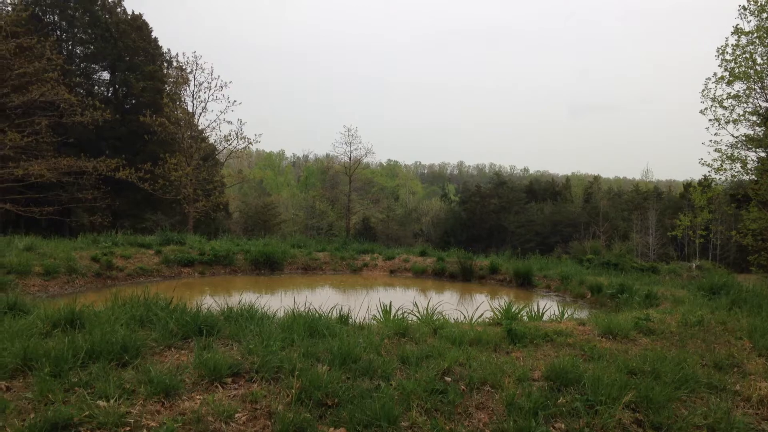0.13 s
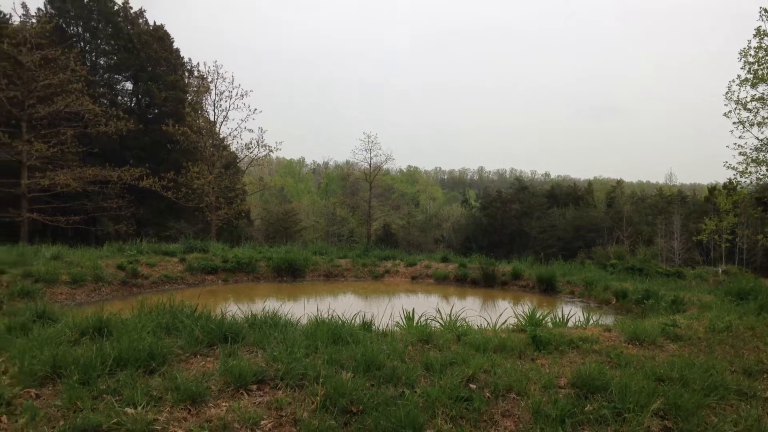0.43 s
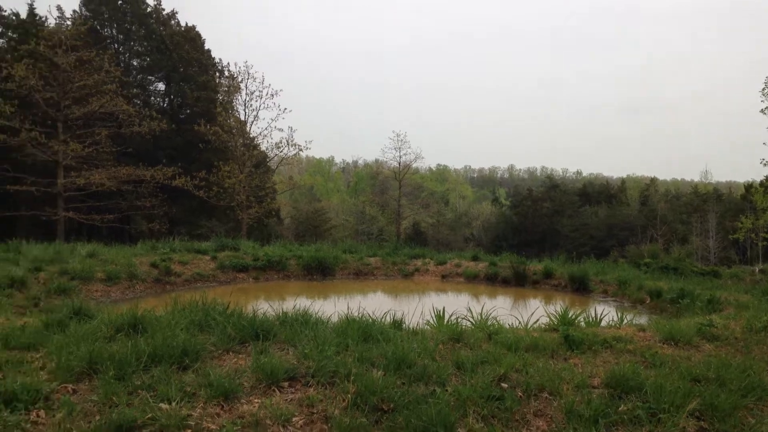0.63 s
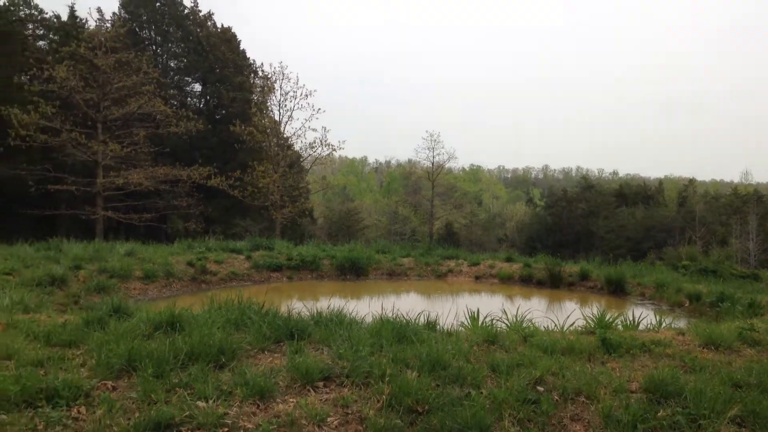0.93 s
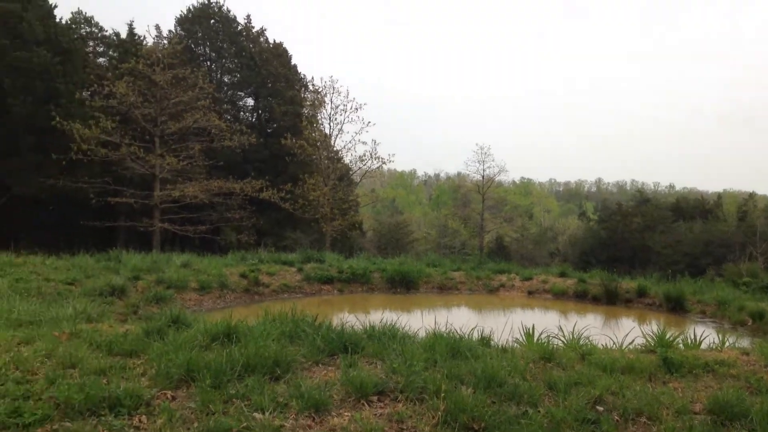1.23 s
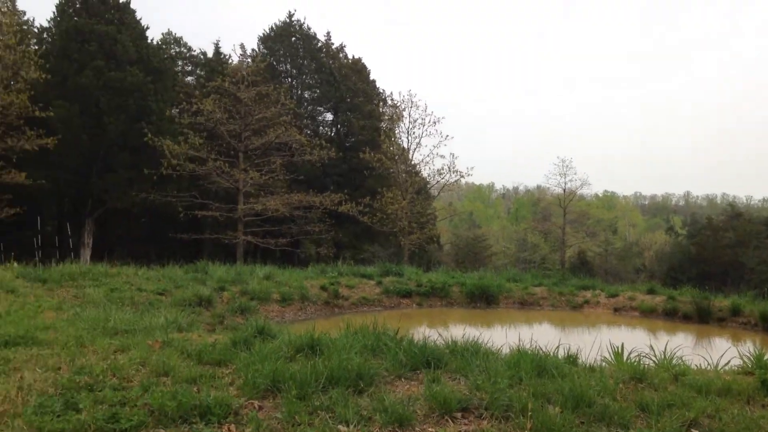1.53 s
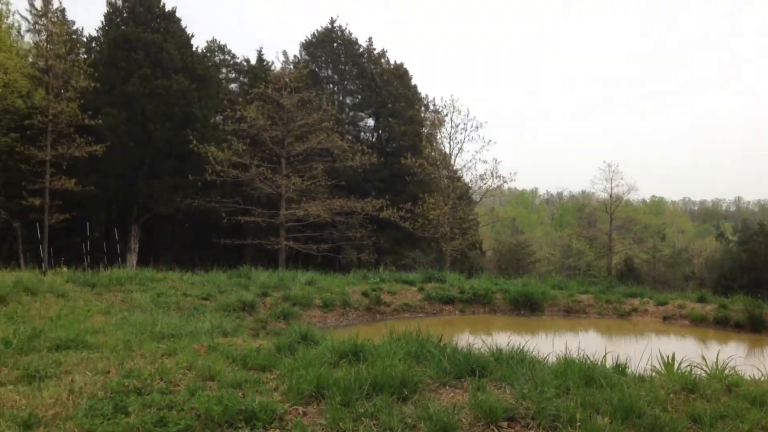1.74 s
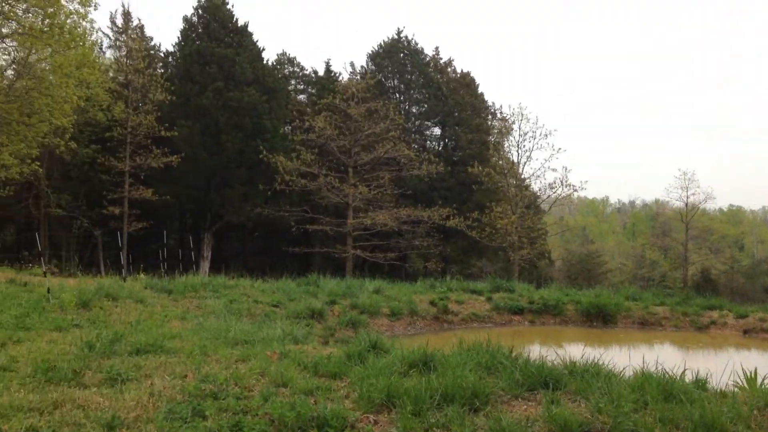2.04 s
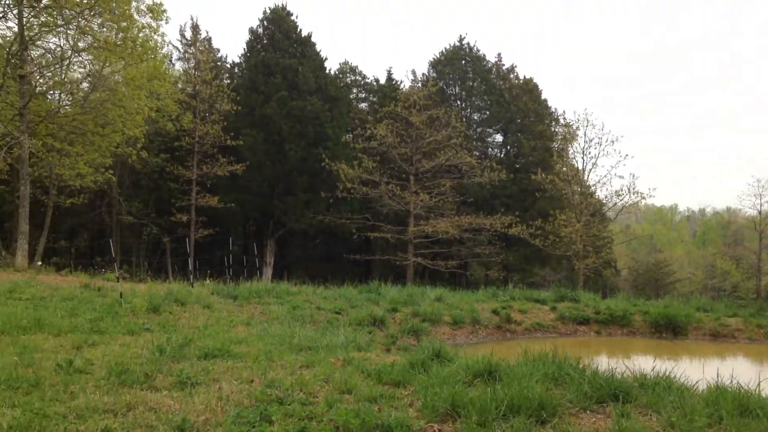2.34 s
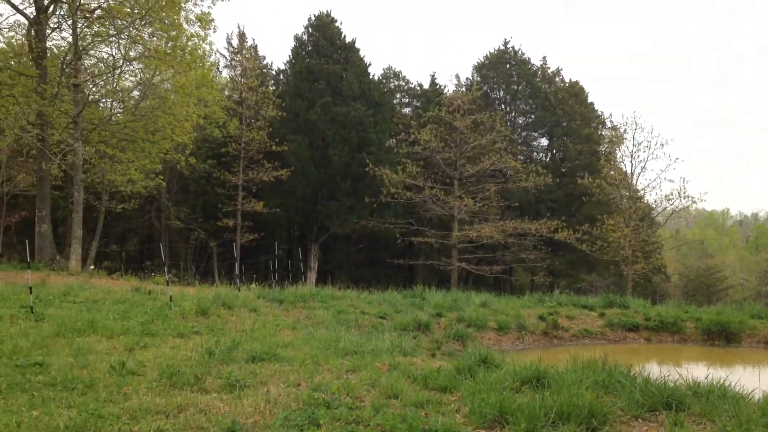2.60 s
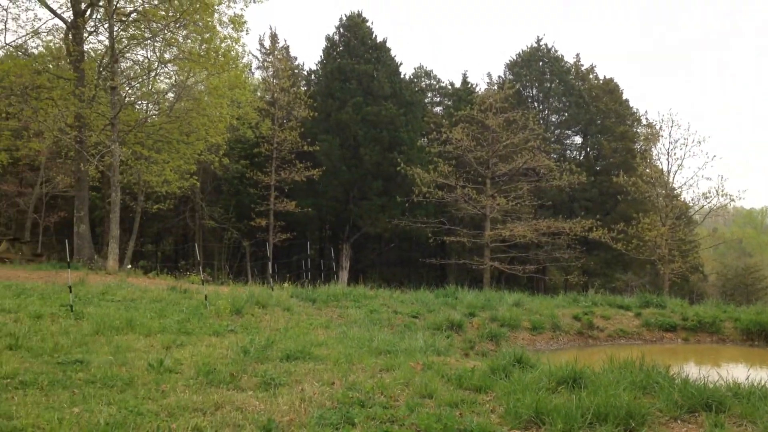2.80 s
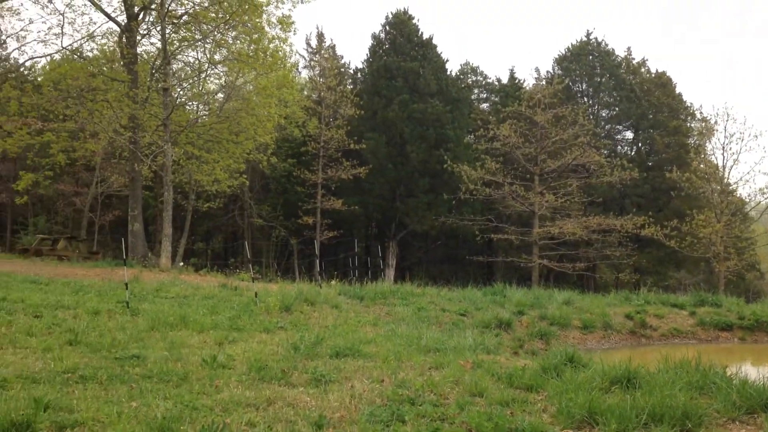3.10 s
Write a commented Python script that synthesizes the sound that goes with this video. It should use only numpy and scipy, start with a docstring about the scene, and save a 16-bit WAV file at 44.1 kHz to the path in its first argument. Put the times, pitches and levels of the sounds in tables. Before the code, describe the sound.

Frogs trilling in a dense, steady high chorus around a pond, with light wind bumps on the microphone

```python
"""A chorus of frogs trills around a pond in a grassy clearing, each repeating a short tone pulse 36-48 times a second.
The nearest frog shows many overtones; the others are tones with two faint harmonics.
Fading scatter from the tree line follows every frog. Light wind rumbles and thumps on the microphone,
over a faint hiss of shaped noise with a narrow gap near 2 kHz, with a few dry noise ticks and short falling peeps."""
import sys
import numpy as np
from scipy import signal
from scipy.fft import rfft, irfft
from scipy.io import wavfile

SR = 44100
rng = np.random.default_rng(int(sys.argv[2]) if len(sys.argv) > 2 else 0)


def store_wav(level_fs):
    """Save 16-bit WAV to argv[1]."""
    pcm = np.round(np.clip(np.atleast_2d(level_fs), -1, 1) * 32767)
    wavfile.write(sys.argv[1], SR, pcm.T.astype(np.int16))


N = 143766
TIME = np.arange(N) / SR  # s


def from_db(db):
    """Turn decibels into a gain."""
    return 10 ** (np.asarray(db) / 20)


def rms_one(x):
    """Scale to an rms (average strength) of one."""
    return x / np.sqrt(np.mean(x ** 2) + 1e-20)


def in_time(rows):
    """Join (t/s, value) rows into a curve with a value at every sample."""
    return np.interp(TIME, *np.transpose(rows))


def drift(rate_hz):
    """Slow random wandering with rms one: noise smoothed twice, so it changes about rate_hz times a second."""
    step = 40  # samples between the drawn points
    keep = np.exp(-2 * np.pi * rate_hz * step / SR)
    draws = rng.standard_normal(N // step + 2002)
    slow = signal.lfilter([1], [1, -2 * keep, keep * keep], draws)
    slow = rms_one(slow[2000:])  # drop the filter's settling time
    return np.interp(np.arange(N) / step, np.arange(len(slow)), slow)


def noise(colour):
    """Random noise with rms one, its spectrum shaped by (f/Hz, level/dB) rows."""
    hz, db = np.transpose(colour)
    bins_hz = np.maximum(np.fft.rfftfreq(N, 1 / SR), 1)
    gain = from_db(np.interp(np.log(bins_hz), np.log(hz), db))
    return rms_one(irfft(rfft(rng.standard_normal(N)) * gain, N))


def trill(turns, hz, length_s, scatter, centre_s=0, sag_hz_per_s=0, harmonics=False):
    """One tone pulse on each whole turn of the beat; each has its own timing, strength, pitch and phase."""
    pulse_scatter_db, beat_jitter_s = 0.47, .0003
    second_harmonic_db, third_harmonic_db = -35.5, -40.5
    skew = .8  # under 1: the pulse swells faster than it fades
    beats = np.interp(np.arange(1, int(turns[-1]) + 1), turns, TIME)
    chance = rng.standard_normal((256, 4))
    t = np.arange(int(length_s * SR)) / SR
    swell = np.sin(np.pi * (t / length_s) ** skew) ** 2
    out = np.zeros(N + SR)
    for beat, (late, loud, sharp, turn) in zip(beats, chance):
        steady = hz * (1 + scatter * sharp) * t
        fall = sag_hz_per_s * (t - length_s / 2) ** 2 / 2
        phase = 2 * np.pi * (steady - fall + turn)
        tone = np.sin(phase)
        if harmonics:
            tone = tone + from_db(second_harmonic_db) * np.sin(2 * phase)
            tone = tone + from_db(third_harmonic_db) * np.sin(3 * phase)
        start_s = beat + centre_s - length_s / 2 + beat_jitter_s * late
        i = max(0, int(start_s * SR))
        out[i:i + len(t)] += from_db(pulse_scatter_db * loud) * swell * tone
    return out[:N]


def near_frog():
    """The nearest frog slows a little and brightens; its partials share one beat and fall in pitch each pulse."""
    # how fast it pulses: (t/s, pulses per second)
    pulse_rate = [(0.12, 43.36), (0.6, 42.85), (1.0, 42.89), (1.4, 42.55), (1.8, 41.95), (2.2, 42.04),
                  (2.55, 40.91), (2.9, 41.49), (3.26, 40.87)]
    # tones in each pulse: (f/Hz, level/dB before brightening, centre after the beat/s, length/s)
    partials = [(1546.5, -40.5, -.0006, .014), (1382, -58.5, -.005, 0.014), (1392, -59, .005, 0.014),
                (2268, -59.5, .0008, .010), (3004, -70.5, -0.0019, .009), (3790, -74.5, -.0005, 0.011),
                (4610, -71.5, -.0022, 0.0054), (4850, -75, .003, .010), (5330, -72, -.0035, .006),
                (5270, -67.5, .0009, .008)]
    # extra level of the partials above 2500 Hz: (t/s, level/dB)
    overtone_level = [(.12, -2), (1.15, -1), (1.55, 2.6), (2.2, 2), (2.6, 3), (3.26, 4)]
    overtones_above_hz, sag_hz_per_s = 2500, 7700
    pitch_scatter = 0.013  # fraction of the pitch
    turns = .1 + np.cumsum(in_time(pulse_rate)) / SR
    bright_db = in_time(overtone_level)
    out = 0
    for hz, db, centre_s, length_s in partials:
        pulses = trill(turns, hz, length_s, pitch_scatter, centre_s, sag_hz_per_s)
        level_db = db + bright_db * (hz > overtones_above_hz)
        out = out + from_db(level_db) * pulses
    return out


def far_frog(hz, per_s, length_s):
    """A frog across the pond, keeping its own slightly wandering beat."""
    rate_wander, pitch_scatter = .012, .006  # fractions of the rate and the pitch
    rate = per_s * (1 + rate_wander * drift(1))
    turns = rng.random() + np.cumsum(rate) / SR
    return trill(turns, hz, length_s, pitch_scatter, harmonics=True)


def high_frog():
    """The highest, fastest frog, which falls nearly silent and then resumes."""
    # its loudness: (t/s, level/dB)
    high_level = [(.12, -43), (.7, -44.5), (1.7, -39.5), (1.87, -75), (2.25, -56), (2.5, -44),
                  (3.26, -39.5)]
    return from_db(in_time(high_level)) * far_frog(hz=1782.7, per_s=48.0, length_s=.013)


def other_frogs():
    """The rest of the chorus, a list of far frogs whose levels rise and fall together."""
    # one row a frog: (f/Hz, pulses per second, level/dB before the shared level, pulse length/s)
    frog_rows = [(1636.4, 40.9, -39.5, .015), (1671.7, 43.9, -39, .015), (1717.6, 42, -39.5, .016),
                 (1590, 36, -47, .016), (1657.4, 42, -44, .016)]
    # shared level added to every row: (t/s, level/dB)
    chorus_level = [(.12, -3.5), (.6, -1), (1.0, -2), (1.5, -1), (2.0, -2.5), (2.6, -1), (2.85, -4.5),
                    (3.26, -6)]
    chorus_db = in_time(chorus_level)
    return [from_db(db + chorus_db) * far_frog(hz, per_s, length_s)
            for hz, per_s, db, length_s in frog_rows]


def woods(x):
    """Scatter from the tree line: many random echoes, dying away by 60 dB in t60_s."""
    level_db, t60_s, delay_s = -9, 0.62, .03
    t = TIME[:SR]
    echoes = rng.standard_normal(SR) * from_db(-60 * t / t60_s) * (t > delay_s)
    echoes = echoes / np.linalg.norm(echoes)
    return from_db(level_db) * signal.fftconvolve(x, echoes)[:N]


def hiss():
    """Faint hiss: shaped noise with a narrow gap near 2 kHz, its level flickering slightly."""
    # spectrum of the hiss, with the gap at 1960-2040 Hz: (f/Hz, relative level per Hz/dB)
    hiss_spectrum = [(30, -14.5), (100, 0), (300, -6.5), (550, -9), (850, -9.5), (1300, -6), (1800, -11.5),
                     (1960, -27), (2040, -34), (2120, -9.5), (2600, -16.5), (3400, -17.5), (4100, -19),
                     (5200, -22.5), (6200, -23), (10000, -28), (15000, -31.5)]
    level_db, flicker_db = -62.5, 1
    return from_db(level_db + flicker_db * drift(7.2)) * noise(hiss_spectrum)


def wind():
    """Lumpy rumble, plus brief air pushes that the microphone's low cut and resonance turn into thumps."""
    # strength of the rumble: (t/s, level/dB before the random lumps)
    rumble_level = [(.12, -68), (.68, -70), (.76, -52), (.84, -70), (.98, -54.5), (1.18, -61), (1.4, -59),
                    (1.62, -55.5), (1.72, -69), (1.82, -56.5), (1.98, -49), (2.1, -65), (2.3, -69.5),
                    (2.43, -54), (2.62, -64.5), (2.72, -49.5), (2.82, -63.5), (3.0, -61.5), (3.15, -54)]
    # tone colour of the rumble: (f/Hz, relative level per Hz/dB)
    rumble_colour = [(20, -25), (45, -2), (75, 3), (120, -6), (200, -16.5), (400, -39), (1000, -75)]
    # pushes of air: (t/s, level before filtering/dB, half-width/s)
    buffets = [(0.742, -30.5, 0.0045), (0.964, -44, 0.0021), (1.055, -42, 0.0045), (1.474, -31, 0.0058),
               (1.583, -32.5, 0.0036), (1.655, -31, 0.0053), (1.782, -39.5, 0.0022), (1.813, -45, 0.00095),
               (1.831, -34.5, 0.0036), (1.872, -35.5, 0.002), (1.9946, -30.5, 0.0011), (2.407, -31, 0.0046),
               (2.429, -33, 0.0029), (2.48, -34, 0.003), (2.561, -31, 0.0019), (2.704, -40.5, .004),
               (2.738, -36.5, 0.003), (3.067, -43, 0.0024)]
    lump_db, low_cut_hz = 1, 60.5
    bump_hz, bump_q, bump_db = 104.5, 2.1, -3.5  # the microphone's low resonance
    rumble = from_db(in_time(rumble_level) + lump_db * drift(30)) * noise(rumble_colour)
    pushes = sum(from_db(db) * np.exp(-((TIME - s) / width_s) ** 2) for s, db, width_s in buffets)
    # the low cut turns each push into a swing up and down
    low_cut = signal.butter(4, low_cut_hz, "high", fs=SR, output="sos")
    thumps = signal.sosfilt(low_cut, pushes)
    resonance = signal.lfilter(*signal.iirpeak(bump_hz, bump_q, fs=SR), thumps)
    return rumble + thumps + from_db(bump_db) * resonance


def ticks():
    """Small dry ticks near the microphone: noise that starts at once and dies within milliseconds."""
    # when and how loud: (t/s, level/dB)
    tick_rows = [(.1432, -45), (.7928, -47.5), (1.72, -58), (2.146, -58), (2.424, -60), (2.469, -60)]
    # tone colour of the ticks: (f/Hz, relative level/dB)
    tick_colour = [(300, -4), (1500, -2), (3500, -4), (8000, -9.5), (15000, -21)]
    decay_s = .0006
    level = 0
    for s, db in tick_rows:
        fade = np.exp(-np.abs(TIME - s) / decay_s)
        level = level + from_db(db) * (TIME >= s) * fade
    return level * noise(tick_colour)


def peeps():
    """Faint, very short whistles: tones that fall in pitch as they swell and fade."""
    # one row a peep: (t/s, f/Hz at its middle, level/dB)
    peep_rows = [(.231, 4600, -67), (.739, 4690, -64), (.878, 4740, -67), (1.042, 4640, -67)]
    half_width_s, sag_hz_per_s = 0.0025, 18000
    out = 0
    for s, hz, db in peep_rows:
        t = TIME - s
        swell = np.exp(-(t / half_width_s) ** 2)
        tone = np.sin(2 * np.pi * (hz - sag_hz_per_s * t / 2) * t)
        out = out + from_db(db) * swell * tone
    return out


def scene():
    """Add up the frogs, each with its own scatter from the trees, and the hiss, wind, ticks and peeps."""
    frogs = [near_frog(), high_frog()] + other_frogs()
    chorus = sum(frog + woods(frog) for frog in frogs)
    return (chorus + hiss() + wind() + ticks() + peeps())[None]


def record(dry):
    """Start after a moment of silence and cut off the highest treble with a steep filter."""
    start_s, cutoff_hz = .12, 15300
    top_cut = signal.ellip(12, .1, 70, cutoff_hz, fs=SR, output="sos")
    return signal.sosfilt(top_cut, dry * (TIME >= start_s))


dry = scene()
out = record(dry)
store_wav(out)
```